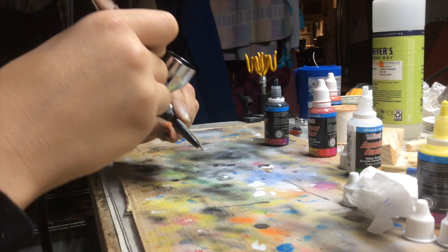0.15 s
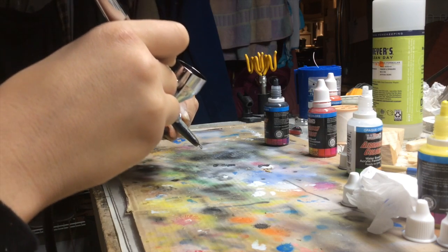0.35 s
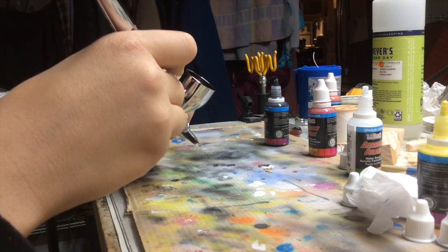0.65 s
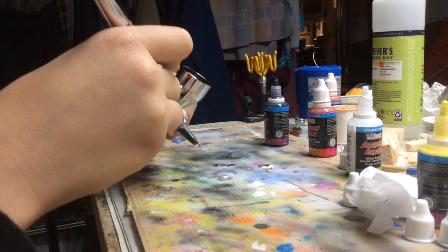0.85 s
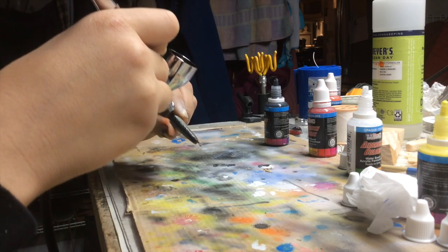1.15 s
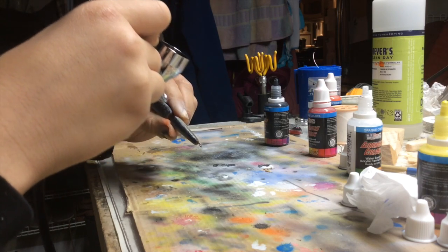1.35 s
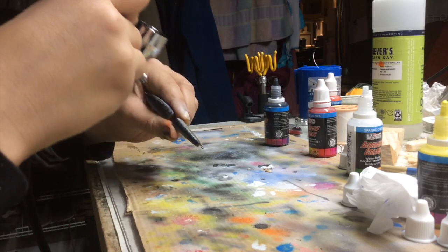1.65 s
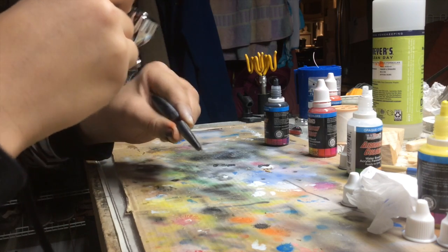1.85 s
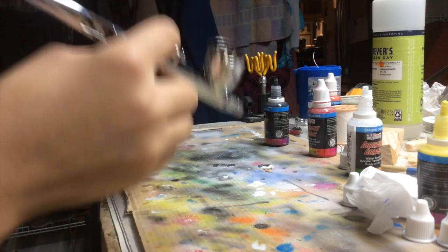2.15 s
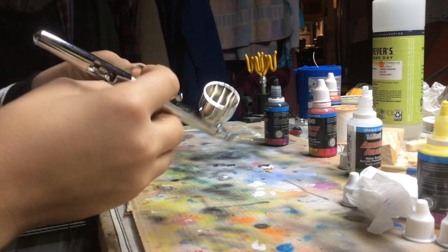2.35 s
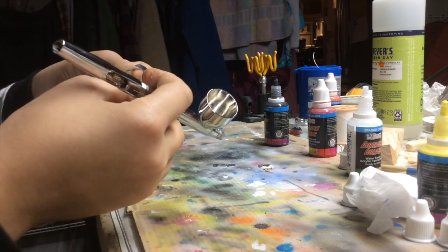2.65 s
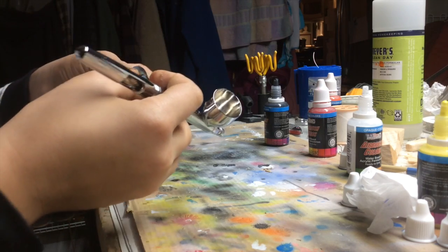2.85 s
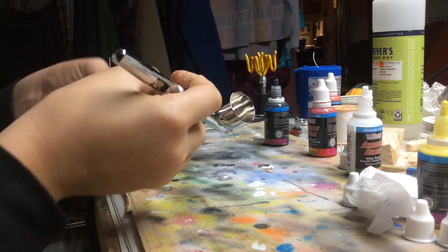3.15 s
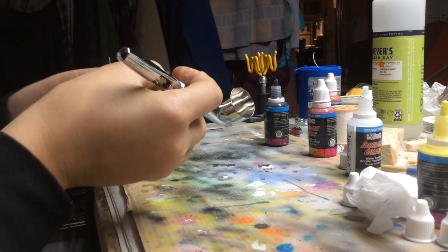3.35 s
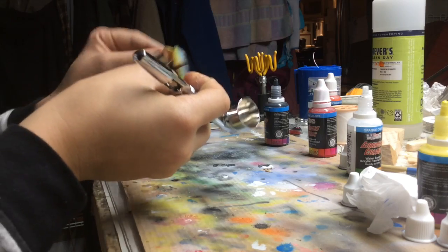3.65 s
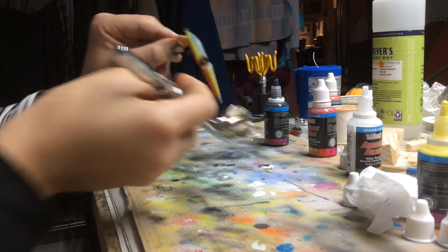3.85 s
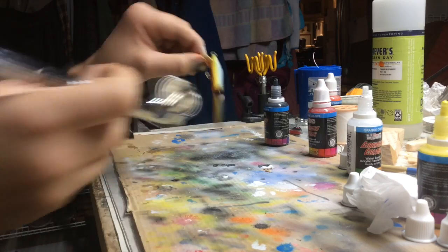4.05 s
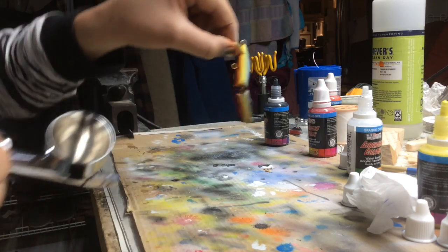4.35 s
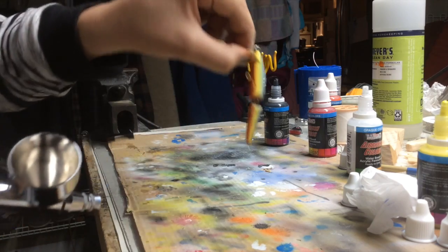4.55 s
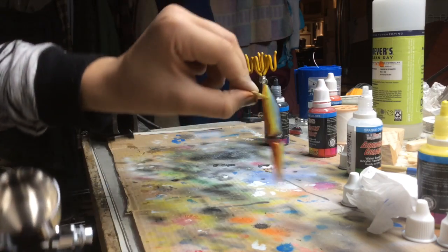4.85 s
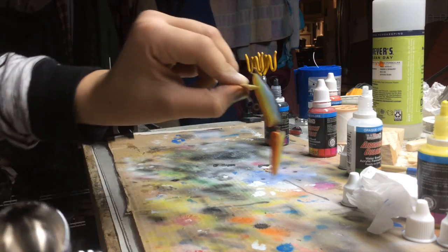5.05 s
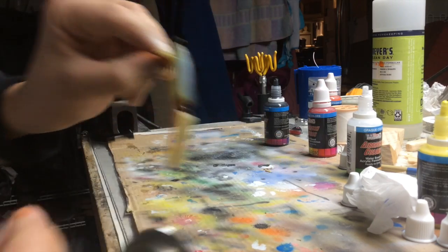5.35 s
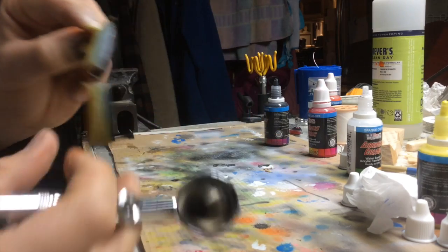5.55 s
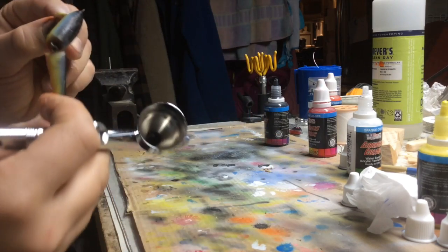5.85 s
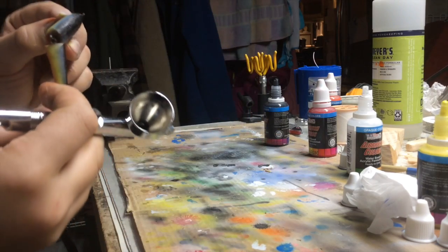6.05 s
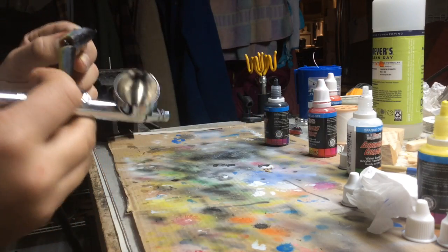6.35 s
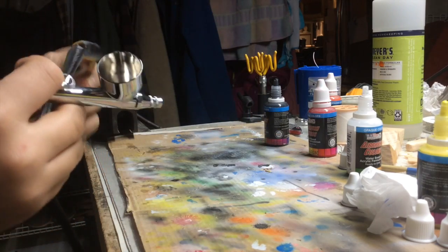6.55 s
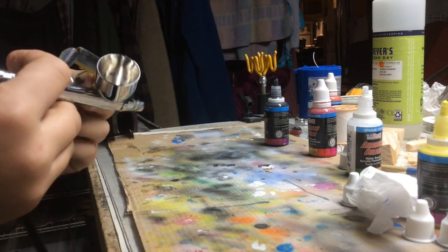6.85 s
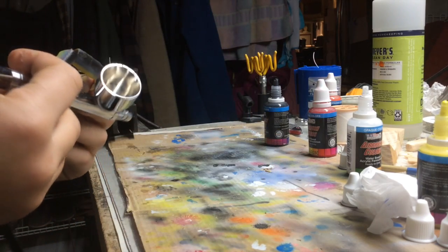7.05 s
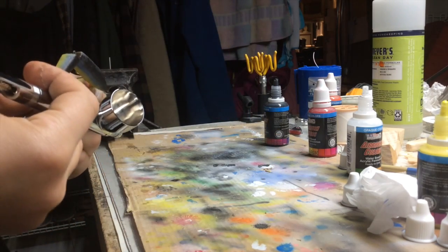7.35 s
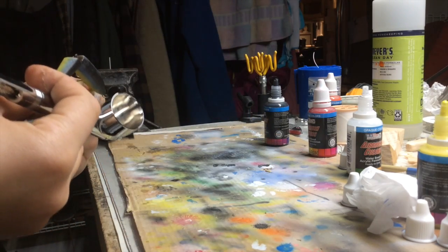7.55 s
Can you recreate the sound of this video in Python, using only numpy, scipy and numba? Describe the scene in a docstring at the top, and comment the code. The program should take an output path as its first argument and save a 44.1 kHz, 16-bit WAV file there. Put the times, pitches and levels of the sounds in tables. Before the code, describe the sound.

From the start, a small piston compressor chugs steadily, about twenty-seven strokes a second, so fast that they merge into a low, buzzing hum with a rattling housing, tiny metallic valve ticks and a thin, throbbing hiss of leaking air. Over it an airbrush sprays close by: a strong bright burst at 0.15 seconds, a softer swell around 0.4 to 0.6, a lull near 0.8, another rise from 1.0, then crisp, quick pulses between 1.25 and 1.5 and a breathier, duller push around 1.7. At 1.87 it snaps shut within milliseconds. One soft, hollow knock follows at 2.15. From then on the compressor drones almost unchanged over low bench and room rumble, until a very faint rub of fingers around 7.6. The sound is close and centred, with a short workshop echo on the spray and knock.

```python
"""An airbrush hiss swells and sinks with the trigger, then shuts off; a small piston compressor chugs on throughout.
The airbrush is coloured noise, plus noise passed through the hollows between the hands and the piece being sprayed.
The compressor is a hum of sine waves, blows that ring its housing and valve once or more a turn, and leaking air.
A knock and a faint rub of fingers follow the spraying, over a low rumble of bench and room. One close microphone.
"""
import sys
import numpy as np
from scipy import signal
from scipy.fft import rfft, irfft
from scipy.io import wavfile
from scipy.ndimage import uniform_filter1d
from numba import njit

SR = 44100
rng = np.random.default_rng(int(sys.argv[2]) if len(sys.argv) > 2 else 0)


def pcm_store(signal):
    """Save signal as 16-bit PCM."""
    levels = np.round(np.clip(np.atleast_2d(signal), -1, 1) * 32767)
    wavfile.write(sys.argv[1], SR, levels.astype(np.int16).T)


N = 340452


def undb(db):
    """Turn decibels into a gain."""
    return 10 ** (np.asarray(db) / 20)


def unit(x):
    """Scale a sound to an rms level of 1."""
    return x / np.sqrt(np.mean(x ** 2))


def curves(table):
    """Draw straight lines between the rows of a table, giving each column one value per sample."""
    s, *columns = np.transpose(table)
    return [np.interp(np.arange(N) / SR, s, column) for column in columns]


def walk(rate):
    """Smooth random wandering with an rms of 1; the rate says how many new values come per second."""
    step = int(SR / rate)
    values = np.repeat(rng.standard_normal(N // step + 1), step)
    return unit(uniform_filter1d(values, step)[:N])


def swell(middle_s, half_s):
    """A smooth rise and fall of height 1, as a moving hand makes it."""
    return np.exp(-((np.arange(N) / SR - middle_s) / half_s) ** 2)


def noise(spectrum):
    """Noise with a given density in dB per Hz, made by shaping the spectrum of white noise."""
    hz, db = np.transpose(spectrum)
    bins = np.arange(N // 2 + 1) * SR / N
    gain = undb(np.interp(np.log(bins + 1), np.log(hz), db))
    return irfft(rfft(rng.standard_normal(N)) * gain, N) * np.sqrt(SR / 2)


@njit
def bandpass(x, hz, width):
    """Band-pass filter with a moving centre; two stored values carry the resonance along."""
    y, band, low = np.empty(len(x)), 0., 0.
    for i in range(len(x)):
        g, k = np.tan(np.pi * hz[i] / SR), width / hz[i]
        v = (band + g * (x[i] - low)) / (1 + g * (g + k))
        band, low, y[i] = 2 * v - band, low + 2 * g * v, k * v
    return y


def resonate(x, hz, width, order=1):
    """Pass a sound through a resonance, more than once for steep sides; rms 1."""
    for _ in range(order):
        x = bandpass(x, hz * np.ones(N), float(width))
    return unit(x)


def ring(times, sizes, hz, swell_s):
    """Strike one mode (one ringing tone), which builds up for its swell time and then dies away."""
    blows = np.zeros(N + 1)
    keep = (times >= 0) & (times < (N - 1) / SR)
    # share each blow between two samples, so it can fall between them
    whole, part = np.divmod(times[keep] * SR, 1)
    first = whole.astype(int)
    blows[first] += sizes[keep] * (1 - part)
    blows[first + 1] += sizes[keep] * part
    t = np.arange(SR // 10) / SR
    envelope = (t / swell_s * np.exp(1 - t / swell_s)) ** 2
    return signal.oaconvolve(blows, envelope * np.sin(2 * np.pi * hz * t))[:N]


def jet(steady_db=-37.5, flutter_db=0.9):
    """Air rushing out of the nozzle makes coloured noise, louder with deeper pulls on the trigger."""
    # colour of the jet: (frequency [Hz], relative level [dB])
    colour = [(700, -27.5), (1400, -13), (3100, -16), (6200, -16.5), (6750, -9), (8000, -2), (8750, -2.5),
              (9400, 5), (10200, 3), (11400, 3.5), (12400, -0.5), (13150, -18), (13900, -1.5), (15800, -9)]
    # pulls on the trigger: (time at the deepest [s], half length [s], added hiss [dB])
    pulls = [(0.175, 0.055, 6), (0.575, 0.096, 3), (1.256, 0.077, 3.5), (1.372, 0.05, 6.5),
             (1.465, 0.038, 6.5), (1.832, .03, 0)]
    pull_db = sum(db * swell(s, half_s) for s, half_s, db in pulls)
    return unit(noise(colour)) * undb(steady_db + pull_db + flutter_db * walk(68.0))


def rush(body_db=-5, upper_db=-3.0, flutter_db=1.62):
    """Air rushes in the hollows around the hands, whose resonances colour it as the jet crosses the piece."""
    # hollows between hands and piece, shifting as the nozzle moves:
    # (time [s], lower resonance [Hz], upper resonance [Hz])
    hollows = [(.15, 2030, 4200), (.4, 2200, 3950), (.75, 2470, 4040), (1.15, 2120, 3980),
               (1.75, 2360, 4420)]
    # passes of the jet across the piece:
    # (time at the middle [s], half length [s], rush [dB], extra for the upper part [dB])
    passes = [(0.133, 0.046, -46, -2.5), (0.37, 0.2, -52, 2), (0.593, 0.14, -57.5, 9),
              (1.046, 0.19, -50.5, 3.5), (1.417, 0.073, -48, 4.5), (1.723, 0.1, -45.5, -5)]
    rest_db, rest_bright_db = -57.5, 1  # the steady rush between passes, and the extra for its upper part
    # as the nozzle lifts away from the piece, the sharp hiss of its edge fades
    lift_s, edge_start_db, edge_fade_db_per_s = 1.41, 0.5, 51

    lower_hz, upper_hz = curves(hollows)
    dull = undb(rest_db)
    bright = undb(rest_db + rest_bright_db)
    for s, half_s, db, bright_db in passes:
        dull = dull + undb(db) * swell(s, half_s)
        bright = bright + undb(db + bright_db) * swell(s, half_s)
    edge_db = edge_start_db - edge_fade_db_per_s * np.maximum(np.arange(N) / SR - lift_s, 0)

    lower = resonate(rng.standard_normal(N), lower_hz, 1950, order=6)
    body = undb(body_db) * resonate(rng.standard_normal(N), 1375, 800, order=2)
    upper = resonate(rng.standard_normal(N), upper_hz, 1430, order=6)
    edge = undb(edge_db) * resonate(rng.standard_normal(N), 5040, 2500, order=6)
    air = dull * (lower + body) + bright * undb(upper_db) * (upper + edge)
    return air * undb(flutter_db * walk(50.0))


def airbrush(shut_s=1.873, shut_fall_s=0.0094):
    """Jet and rush sound until letting go of the trigger closes the air valve within milliseconds."""
    trigger = np.exp(-np.maximum(np.arange(N) / SR - shut_s, 0) / shut_fall_s)
    return trigger * (jet() + rush())


def hum(turn, waver_db=0.44, lag_turn=0.7525, smear_turn=0.1382):
    """The unbalanced pump shakes at multiples of its speed; the motor hums beside it."""
    # shaking of the pump: (multiple of the shaft speed, average rms level [dB])
    shaking = [(1, -56), (2, -41.5), (3, -46), (4, -47), (5, -60)]
    # motor hum, mostly twice the mains and its sidebands one or two shaft speeds away, and a thin whine:
    # (frequency [Hz], average rms level [dB])
    motor_tones = [(65.8, -63), (92.9, -49.5), (100, -56), (116, -60), (120, -56), (147.1, -66),
                   (174.2, -65), (1546, -69)]
    t = np.arange(N) / SR
    # the springy mounts pass the higher multiples later
    shake = [(k * (turn - lag_turn - smear_turn * k), db) for k, db in shaking]
    motor = [(hz * t + rng.random(), db) for hz, db in motor_tones]
    out = 0
    for cycles, db in shake + motor:
        out = out + undb(db + waver_db * walk(2.6)) * np.sin(2 * np.pi * cycles)
    return np.sqrt(2) * out  # a sine of rms 1 has a peak of root 2


def leak(turn, throb_db=2.2, crest_turn=0.48):
    """Air seeps out as noise with faint whistles, harder at each pressure stroke."""
    # leaking air: (frequency [Hz], average density [dB per Hz])
    air = [(2500, -108), (4500, -109), (6500, -104), (7900, -103), (9400, -93.5), (10600, -100),
           (11900, -95), (13200, -109), (15800, -111)]
    # whistles in the leak: (frequency [Hz], width [Hz], average rms level [dB])
    whistle_bands = [(3706, 80, -74), (3857, 48, -78.5), (5114, 180, -75.5), (10500, 700, -65.5)]
    whistles = 0
    for hz, width, db in whistle_bands:
        whistle = resonate(rng.standard_normal(N), hz, width, order=2)
        whistles = whistles + undb(db + walk(9.2)) * whistle
    pressure_db = throb_db * np.cos(2 * np.pi * (turn - crest_turn))
    return (noise(air) + whistles) * undb(pressure_db + .5 * walk(5))


def rumble():
    """Bench and room rumble steadily, as noise that is strongest at low frequencies."""
    # colour of the rumble: (frequency [Hz], density [dB per Hz])
    colour = [(15, -78), (50, -72.5), (115, -69), (170, -80.5), (260, -79), (430, -91), (600, -86),
              (760, -99), (930, -89), (1150, -99), (2100, -101), (3000, -118)]
    return noise(colour)


def every_turn(turn, delay, db, scatter_db, jitter_s, ripple_db=0):
    """Times and sizes of a blow that comes once a turn; it throbs as the turns beat against the torque ripple."""
    ripple_hz = 120  # the motor's torque ripples at twice the mains frequency
    count = np.arange(int(turn[-1]) + 1)
    late, force = rng.standard_normal((len(count), 2)).T
    # blows past the end get time -1, which ring() leaves out
    times = np.interp(count + delay, turn, np.arange(N) / SR, right=-1)
    throb = ripple_db * np.cos(2 * np.pi * ripple_hz * times)
    return times + jitter_s * late, undb(db + throb + scatter_db * force)


def strokes(turn, scatter_db_per_khz=1.16, jitter_s=.00004, low_throb_db=0.0, high_throb_db=0.4):
    """Valve clack, piston thump and intake follow each other every turn and ring the housing."""
    # housing modes: (frequency [Hz], swell time [s], level from the valve clack [dB],
    # level from the piston thump [dB], level from the intake [dB])
    housing = [(223.7, 0.018, -44, -42.5, -45.5), (251.54, 0.011, -52.5, -66.5, -43),
               (301.2, 0.0043, -59, -43, -76), (598.4, 0.0069, -60.5, -46, -91),
               (685, 0.0039, -56, -72, -86), (929, 0.0059, -45, -53.5, -73), (968, 0.0015, -47, -58, -54.5),
               (1273, 0.0054, -58, -57.5, -75), (1383.5, 0.0039, -45.5, -55.5, -57.5),
               (1664, 0.0058, -58, -65, -66), (2023, 0.0024, -50.5, -61, -61),
               (2160, 0.0037, -63.5, -62, -60.5)]
    # share of a turn after the valve clack at which the piston thumps and the intake opens
    thump_turn, intake_turn = .3174, .6539
    out = 0
    for hz, swell_s, *blow_db in housing:
        # higher modes vary more from blow to blow, and throb more with the torque ripple
        scatter_db = scatter_db_per_khz * hz / 1000
        ripple_db = np.interp(hz, (300, 600), (low_throb_db, high_throb_db))
        for delay, db in zip((0, thump_turn, intake_turn), blow_db):
            times, sizes = every_turn(turn, delay, db, scatter_db, jitter_s, ripple_db)
            out = out + ring(times, sizes, hz, swell_s)
    return out


def valve(turn, spit_db=-73, lag_turn=0.0096, fall_turn=0.2, scatter_db=1.5, jitter_s=.0001):
    """The valve snaps, ringing its small metal parts, and spits a little air."""
    # small metal parts of the valve: (frequency [Hz], swell time [s], level [dB])
    metal_parts = [(2360, 0.0054, -69.5), (2950, 0.00051, -63.5), (5000, 0.0015, -65.5),
                   (7150, 0.00059, -57.5), (7730, 0.0013, -54.5), (9320, 0.0015, -54),
                   (10230, 0.00079, -45), (10620, 0.0023, -53), (13800, .0007, -60)]
    tick = 0
    for hz, swell_s, db in metal_parts:
        times, sizes = every_turn(turn, lag_turn, db, scatter_db, jitter_s)
        tick = tick + ring(times, sizes, hz, swell_s)
    # each spit starts with the snap and fades over the turn
    spit = np.exp(-((turn - lag_turn) % 1) / fall_turn) * rng.standard_normal(N)
    return tick + undb(spit_db) * resonate(spit, 7200, 6000)


def handling(rough_db=3):
    """One soft, hollow knock rings a single mode; later fingers rub faintly, as rough noise."""
    # a light knock as the airbrush is lifted
    knock_s, knock_hz, knock_swell_s, knock_db = 2.1535, 680, 0.0038, -43
    # fingers shifting on the airbrush
    rub_s, rub_half_s, rub_db = 7.62, .06, -69
    knock = ring(np.array([knock_s]), undb([knock_db]), knock_hz, knock_swell_s)
    rub = resonate(rng.standard_normal(N), 2700, 2200, order=2)
    rub_level = swell(rub_s, rub_half_s) * undb(rub_db + rough_db * walk(110))
    return knock + rub * rub_level


def room(x, wet_db=-15, t60=0.23):
    """The cluttered workshop adds a short tail of fading noise, down 60 dB after t60 seconds."""
    t = np.arange(SR // 2) / SR
    tail = rng.standard_normal(len(t)) * np.exp(-np.log(1000) * t / t60)
    return x + undb(wet_db) * signal.fftconvolve(x, tail / np.linalg.norm(tail))[:N]


def scene():
    """Airbrush and handling over compressor and rumble, the same in both channels."""
    # the compressor slows very slightly as it runs
    turns_per_s, slowing_per_s2 = 27.146, .00635
    first_clack_turn = .368  # share of a turn before the first valve clack
    speed = turns_per_s - slowing_per_s2 * np.arange(N) / SR
    turn = np.cumsum(speed) / SR - first_clack_turn
    compressor = hum(turn) + leak(turn) + strokes(turn) + valve(turn)
    mono = room(airbrush() + handling()) + compressor + rumble()
    return np.array([mono, mono])


def record(dry):
    """The recorder cuts the top with a steep low-pass filter."""
    top_hz = 15700
    return signal.sosfilt(signal.ellip(10, .2, 80, top_hz, fs=SR, output="sos"), dry)


dry = scene()
out = record(dry)
pcm_store(out)
```